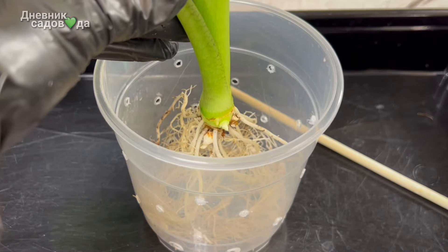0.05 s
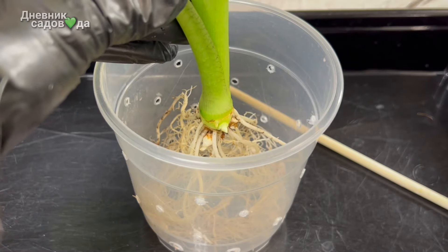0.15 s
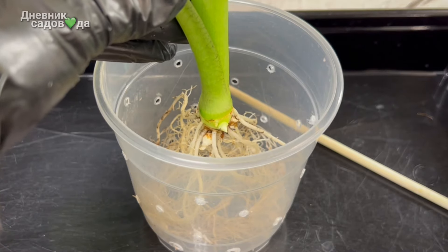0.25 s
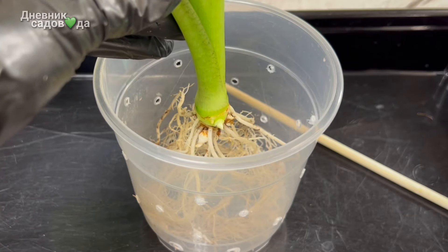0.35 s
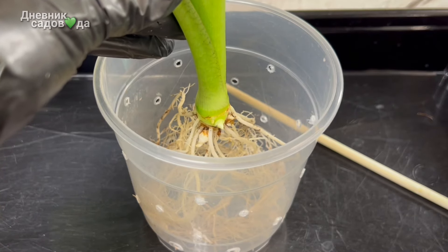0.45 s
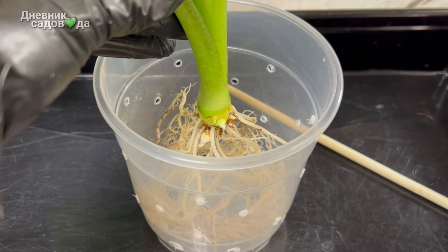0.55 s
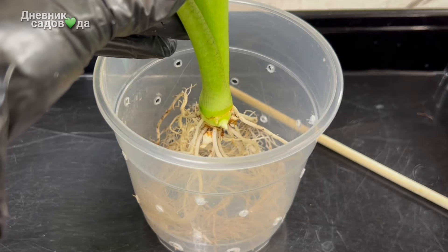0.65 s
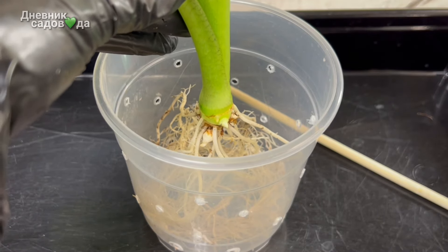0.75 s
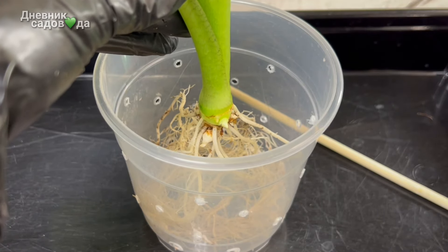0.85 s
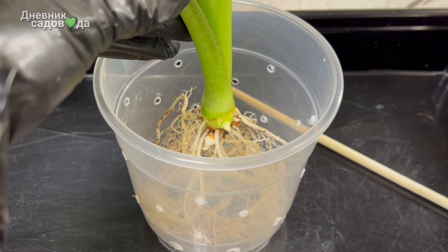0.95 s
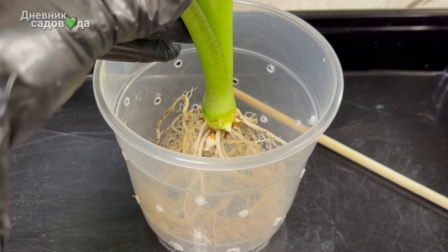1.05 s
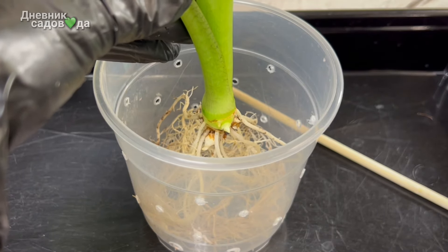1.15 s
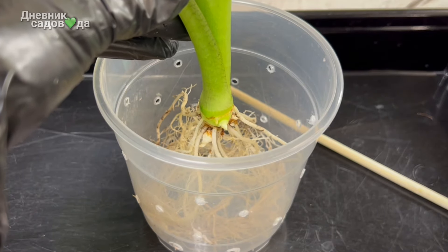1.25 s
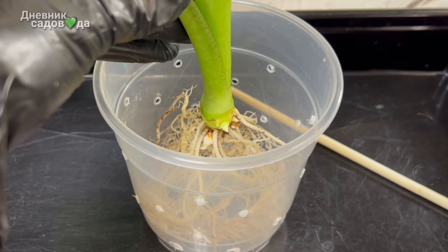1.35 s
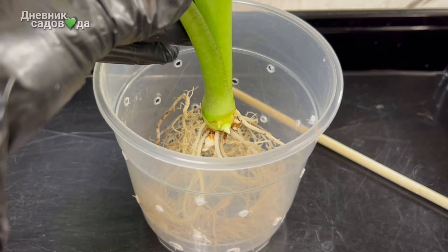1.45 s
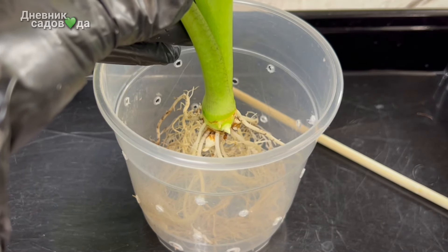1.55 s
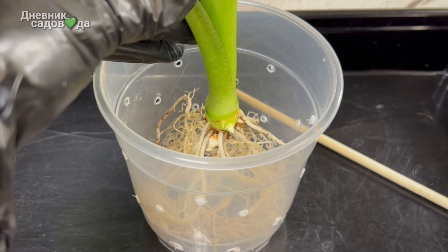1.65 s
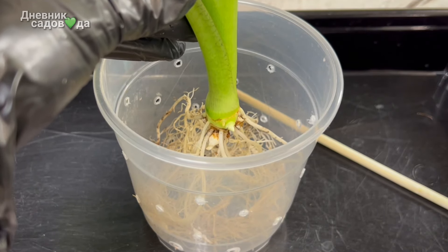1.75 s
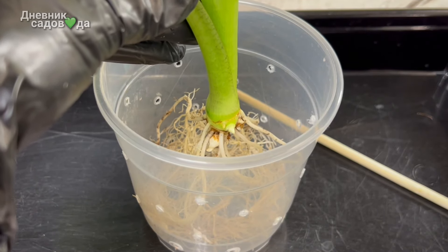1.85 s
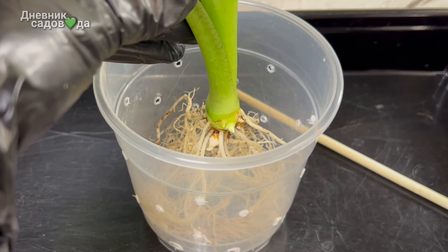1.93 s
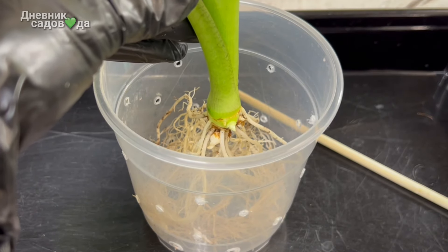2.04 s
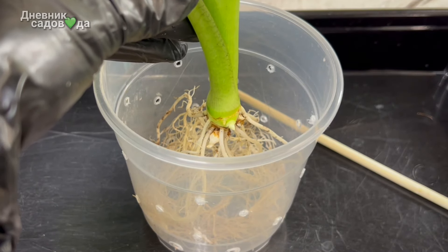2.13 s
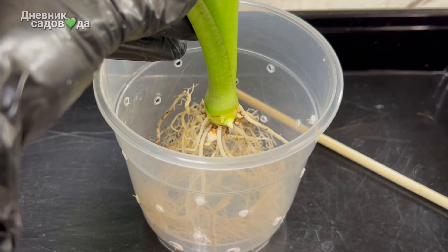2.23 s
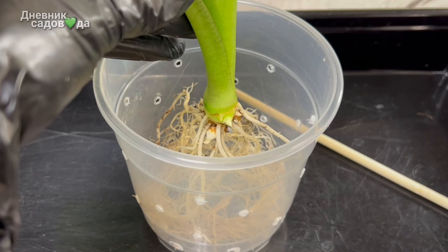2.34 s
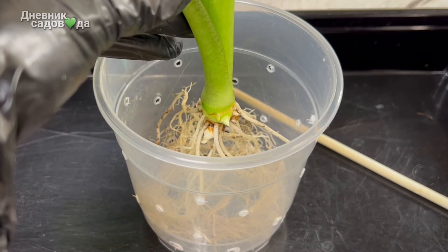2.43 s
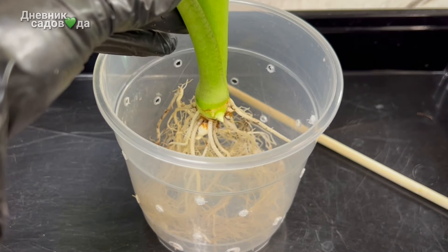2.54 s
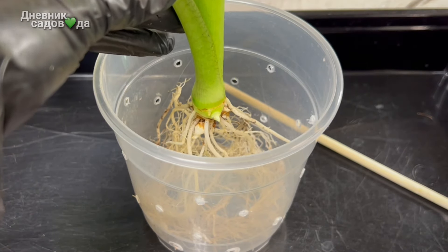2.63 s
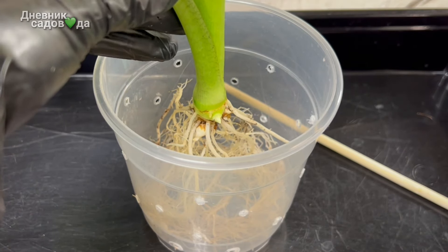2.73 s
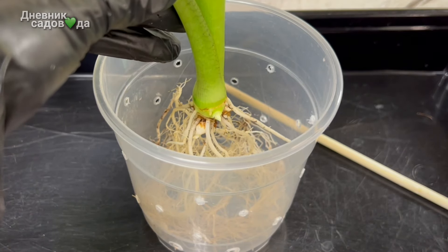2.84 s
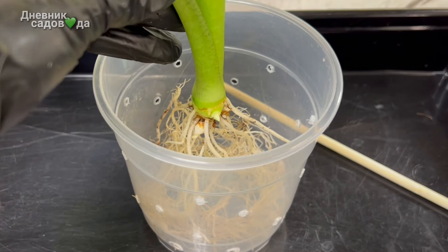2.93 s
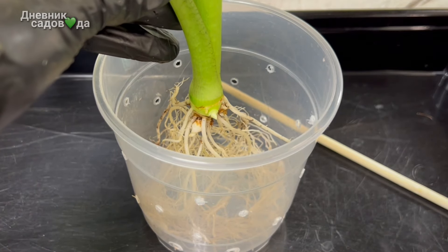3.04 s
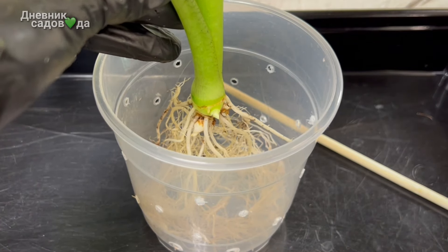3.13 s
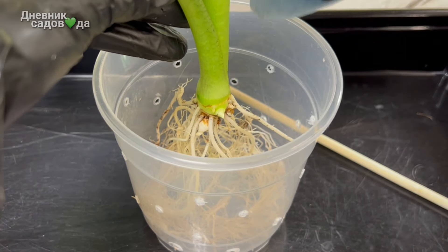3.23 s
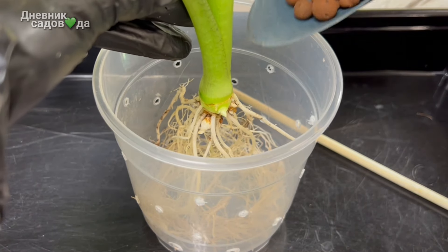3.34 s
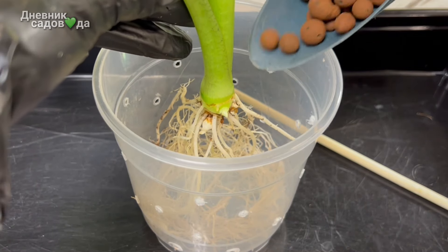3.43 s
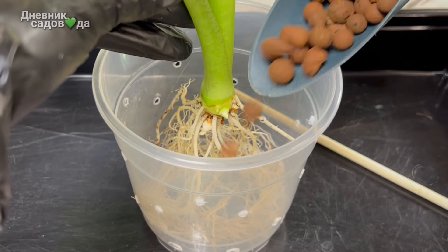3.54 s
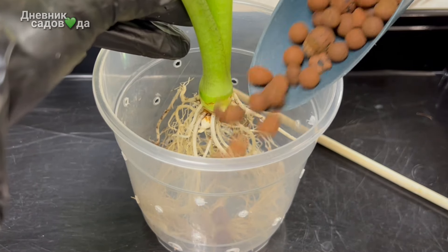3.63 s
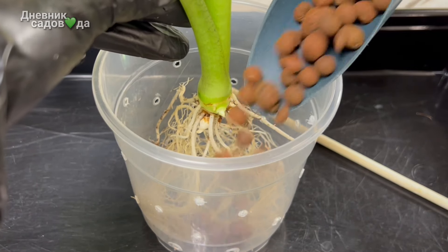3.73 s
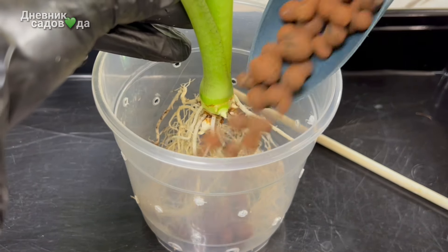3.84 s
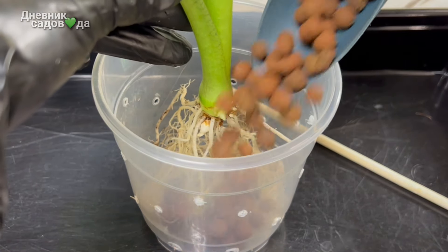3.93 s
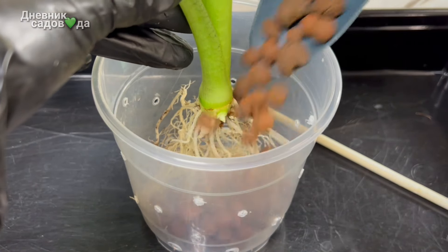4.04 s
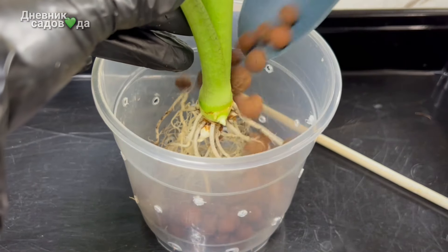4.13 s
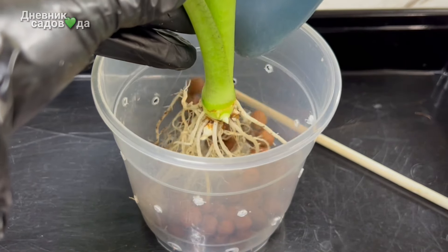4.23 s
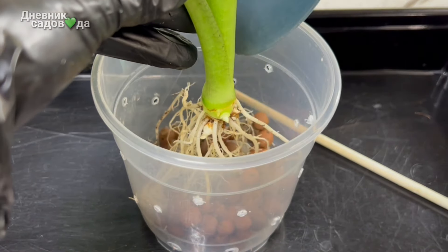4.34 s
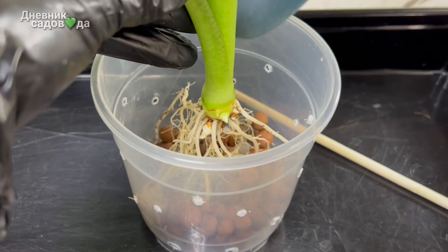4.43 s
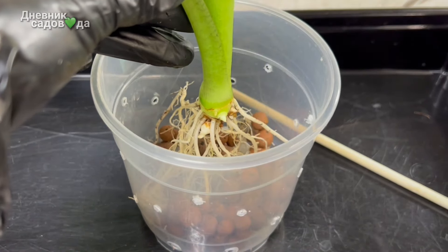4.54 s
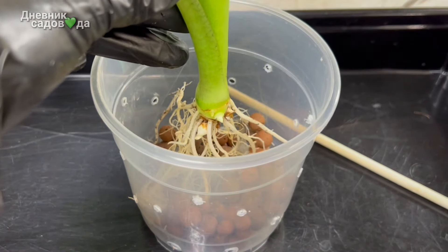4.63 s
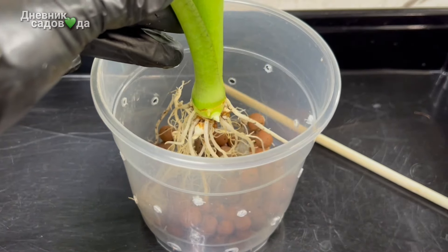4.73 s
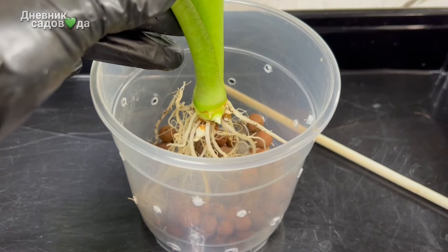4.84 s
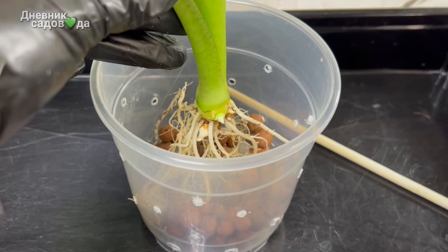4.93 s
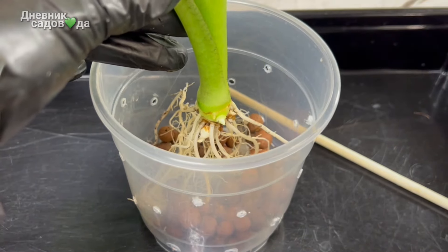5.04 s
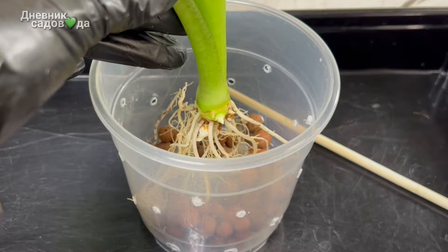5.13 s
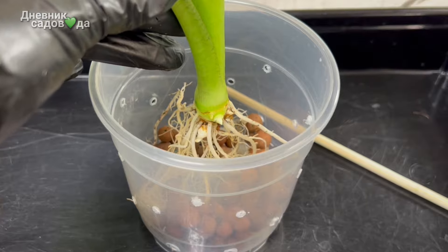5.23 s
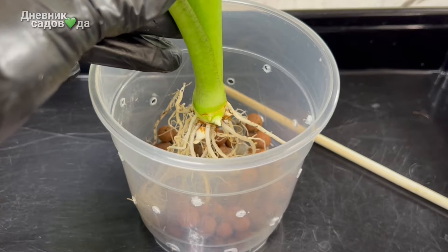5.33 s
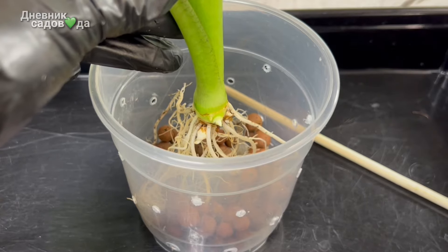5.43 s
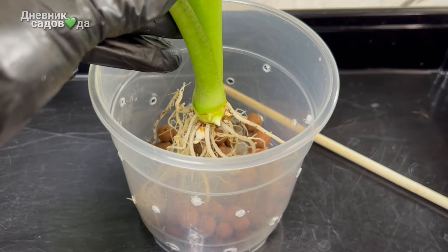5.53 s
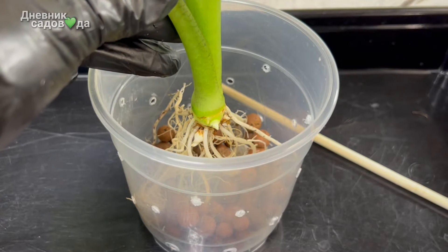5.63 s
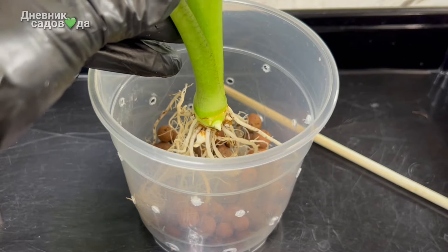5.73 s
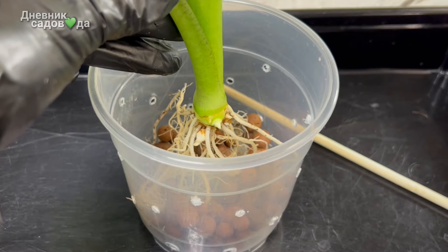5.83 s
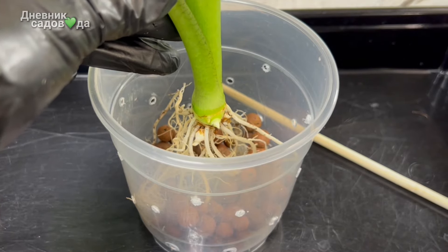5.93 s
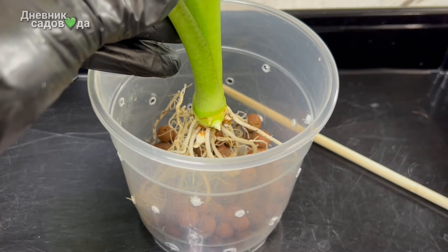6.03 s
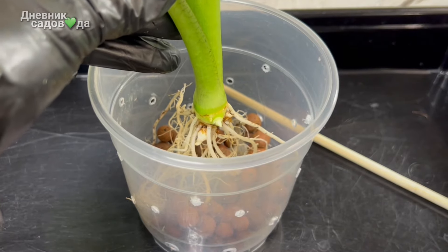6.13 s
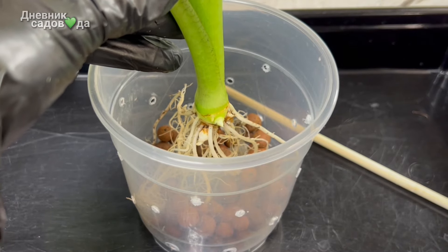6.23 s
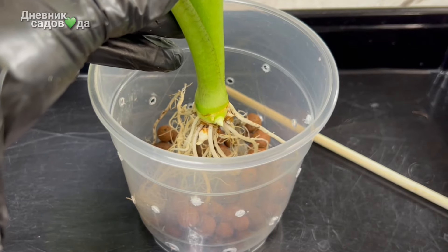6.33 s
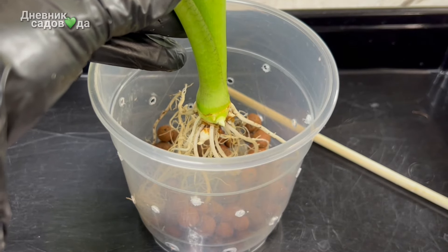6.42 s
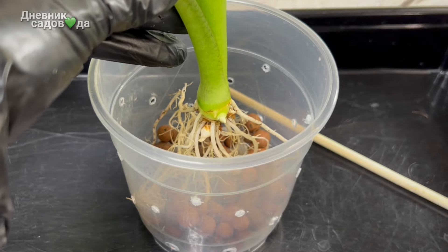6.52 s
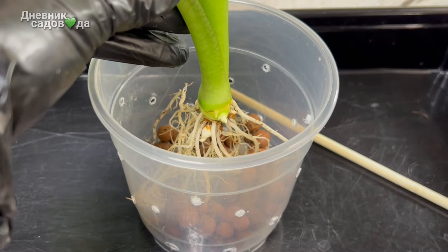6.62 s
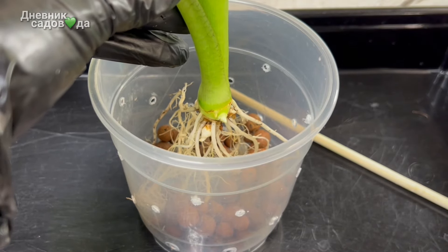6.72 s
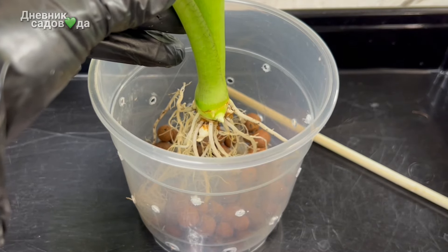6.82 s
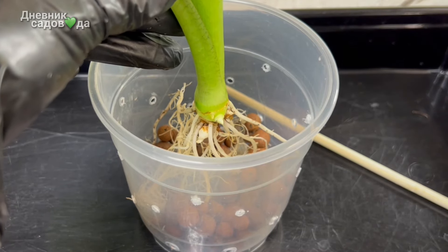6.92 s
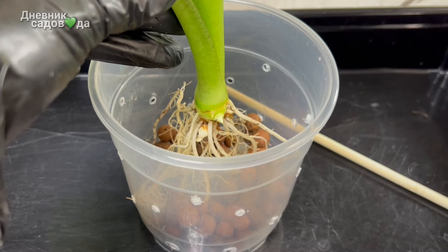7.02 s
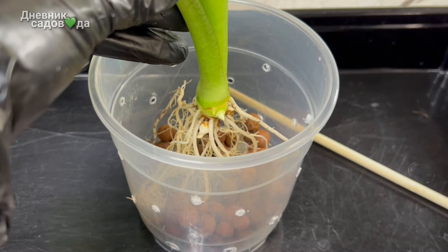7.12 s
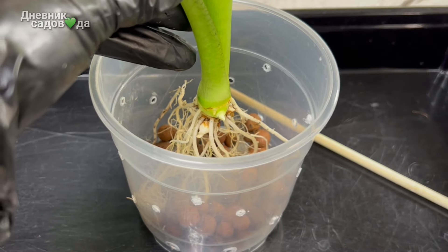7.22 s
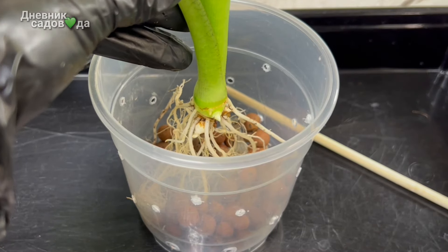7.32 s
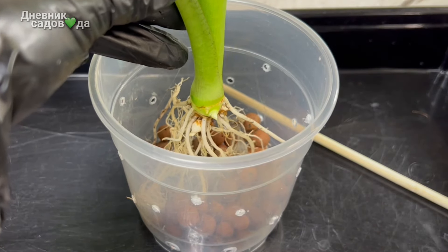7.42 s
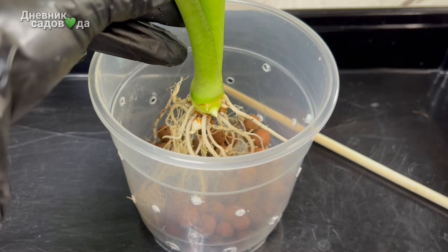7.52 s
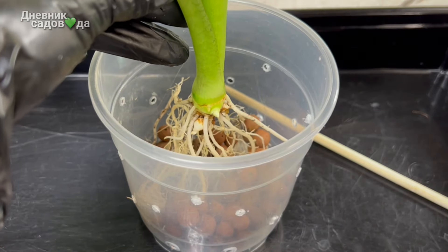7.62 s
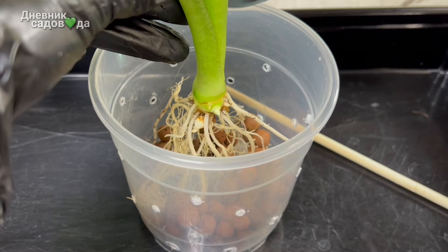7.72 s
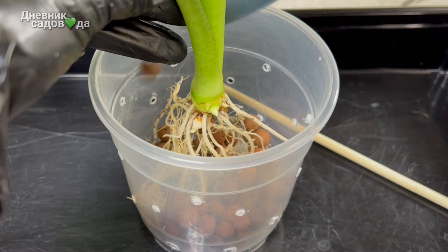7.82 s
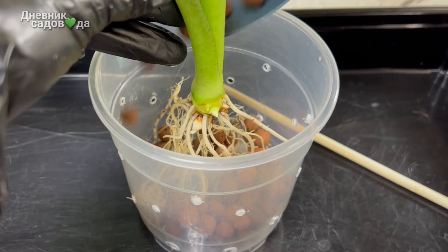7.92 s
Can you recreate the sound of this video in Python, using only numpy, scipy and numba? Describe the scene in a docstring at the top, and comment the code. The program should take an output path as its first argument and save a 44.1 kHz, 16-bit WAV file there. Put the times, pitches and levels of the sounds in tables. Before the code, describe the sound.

A small indoor room with a faint steady hush and low rumble, heard close up. From about 0.1 s a plastic scoop knocks and pushes into a bucket of clay pebbles: dense, crunchy rattle, hollow scoop resonance and a dull bucket boom, strongest around 0.3-0.8 s, easing afterwards. At 1.5-2.0 s loose pebbles clack sharply as the scoop comes out. From 2.3 to 3.4 s it is nearly quiet, with tiny ticks. At 3.5-4.4 s pebbles pour into a thin plastic pot, a bright clatter with hard clicks and short hollow thuds, densest near 4 s. A very faint falling squeak comes at 4.9 s, with soft glove rustling until 5.4 s. Around 5.5 s the scoop digs again, crunching hardest near 6.1 s, with bright clacks at 6.7-6.9 s. After a lull, ticks gather from 7.4 s and a second pour starts clattering just before 8 s.

```python
"""In a small quiet room with a low rumble, a plastic scoop digs clay pebbles out of a bucket.
It carries them over and pours them into a plastic pot; a faint squeak and a rustling glove follow.
Then the scoop digs again and a second pour begins. Thousands of random touches ring the pebbles' pitches;
touches also ring the bucket, scoop and pot, and single pebbles clack as noise and fading tones."""
import sys
import numpy as np
from scipy import signal
from scipy.fft import rfft, irfft, next_fast_len
from scipy.io import wavfile
from scipy.ndimage import uniform_filter1d
from numba import njit

SR = 44100
rng = np.random.default_rng(int(sys.argv[2]) if len(sys.argv) > 2 else 0)


def master_out(mix):
    """Clip the mix to full scale and print it as 16-bit PCM to the path in sys.argv[1]."""
    frames = np.transpose(np.atleast_2d(mix))
    ceiling = np.clip(frames, -1, 1)
    pcm = np.round(ceiling * 32767).astype(np.int16)
    wavfile.write(sys.argv[1], SR, pcm)


N = 351477   # length in samples

# The room's steady hush, as a spectrum shape: pitch_hz, relative_level_db
AIR_SPECTRUM = [(8.8, -13), (15, 1.5), (28, -27.5), (70, -54), (93, -32.5), (282, -38.5), (927, -47),
                (1010, -40), (1100, -50), (1560, -46.5), (3850, -52.5), (5610, -54.5), (15500, -58.5)]
# Digging, one table per scoopful: time_s, rattle_db, treble_over_rattle_db, bucket_boom_db
DIG_CURVES = [
    [(0.13, -32, -4.5, -31.5), (0.17, -49.5, -9, -42), (0.2, -41.5, -3.5, -32), (0.24, -45, 7, -42),
     (0.32, -30, 2, -26.5), (0.37, -32.5, 1.5, -33), (0.42, -27, 4, -30), (0.49, -28, 1, -26.5),
     (0.525, -34, -1, -34), (0.55, -25, -8.5, -34.5), (0.81, -27, -9.5, -39.5), (0.85, -34, -10.5, -45.5),
     (1.18, -34.5, -3, -43), (1.46, -44, 5.5, -49), (1.54, -36.5, 1.5, -47), (1.67, -42.5, 6, -49.5),
     (1.79, -44, 14.5, -52), (1.92, -43.5, 7.5, -49.5), (2.12, -57, 7.5, -73.5), (2.3, -60, -7, -71.5)],
    [(5.476, -29, -3, -33), (5.5, -48, 12.5, -26.5), (5.515, -33.5, -4, -32), (5.6, -31, 2.5, -31.5),
     (5.726, -24, -5.5, -29), (5.802, -28.5, -8.5, -37.5), (5.968, -38, -7.5, -44.5),
     (6.072, -19.5, -9, -33), (6.29, -37.5, -7, -53.5), (6.4, -32, -6.5, -47), (6.52, -38.5, 4.5, -45),
     (6.646, -39.5, 10, -43), (6.69, -43, 2.5, -52), (6.82, -38, 8, -42.5), (6.9, -44, 13, -49),
     (7.28, -65, -1.5, -66)],
]
# Tone color of the rattle while digging: pitch_hz, relative_level_db
DIG_SPECTRUM = [(710, -32), (1200, -1), (2260, 3), (2980, -2), (3500, -0.5), (4880, -6.5), (6170, -8),
                (11600, -20), (14200, -32), (15500, -53.5)]
# Ringing tones of the bucket's body: pitch_hz, relative_level_db, fade_by_60_db_s
BUCKET_TONES = [(62.5, -6.5, 0.24), (146.2, -15, 0.081), (252, -35, 0.057), (283, -6, 0.26),
                (317.2, -6.5, 0.2), (362.2, 1, 0.079), (393, 0, 0.16), (456.6, -4.5, 0.1)]
# Ringing tones of the bucket's rim: pitch_hz, relative_level_db, fade_by_60_db_s
RIM_TONES = [(648, -2, 0.037), (741, -2.5, 0.056), (827, 4, 0.027), (1395, -8.5, 0.023)]
# Ringing tones of the scoop: pitch_hz, relative_level_db, fade_by_60_db_s
SCOOP_TONES = [(1855, 3, 0.018), (2120, -2, 0.11), (2298, -3, 0.25), (2500, 2, 0.021), (3415, 0, 0.13),
               (3600, -0.5, 0.13), (4700, -17, 0.1), (5020, -17, 0.043)]
# The scoop's hollow tone, purest while empty: time_s, pitch_hz, width_hz
HOLLOW_GLIDE = [(.13, 920, 13.3), (.24, 1070, 18), (.5, 1034, 45), (.62, 994, 53), (1.9, 976, 48),
                (2.2, 1040, 39), (5.47, 1063, 6), (5.635, 1069, 6.7), (5.66, 1050, 85), (6.1, 1030, 41),
                (6.3, 940, 98), (6.66, 954, 57), (6.7, 955, 17), (6.9, 1044, 60), (6.93, 1104, 13),
                (7.05, 1100, 40)]
# Single pebbles: start_s, crack_peak_db, pitch_hz, thud_over_peak_db
CLACK_HITS = [(0.1251, -28.5, 2600, 8.5), (0.1972, -26.5, 2830, -3), (0.2415, -27.5, 4400, 0),
              (0.385, -21, 2500, -4), (0.6814, -28.5, 2230, -19.5), (1.047, -26, 2380, -19),
              (1.424, -24.5, 2120, -10.5), (1.5303, -21, 2180, -9), (1.5768, -24, 2250, -5),
              (1.6132, -22, 3600, -26.5), (1.6792, -20.5, 2300, -11), (1.696, -19.5, 2320, -13.5),
              (1.701, -11, 4700, -27), (1.7231, -14.5, 2200, -27), (1.7554, -12.5, 3440, -22.5),
              (1.7663, -8.5, 3700, -22), (1.7732, -11.5, 4280, -27), (1.8822, -18.5, 4700, -20),
              (1.928, -22, 2330, -22), (1.9998, -23, 3700, -23), (2.1643, -33.5, 3800, -6.5),
              (2.2169, -40.5, 2500, -6.5), (2.2433, -38.5, 4000, -20), (2.319, -46.5, 2550, 0),
              (2.3912, -41, 2270, -12), (2.4319, -51, 2830, -3), (2.55, -53, 2580, -3),
              (2.6352, -48, 5700, -21), (2.903, -44, 2400, -19), (2.9163, -41, 2000, -19),
              (3.182, -45, 3240, -26), (3.41, -36.5, 2450, -25), (3.476, -41, 2280, -15),
              (3.4986, -32.5, 3320, -7.5), (3.585, -24, 3800, -18), (3.6494, -22, 4580, -9.5),
              (3.6644, -25, 3380, -21), (3.7235, -17, 4150, -9.5), (3.77, -18, 3370, -7),
              (3.7854, -17, 3700, -10), (3.8058, -8, 3140, -36.5), (3.8123, -14, 4540, -20.5),
              (3.8284, -22.5, 3000, -4.5), (3.8749, -14.5, 3300, -19), (3.8841, -8.5, 3260, -24),
              (3.9382, -15, 4310, -14.5), (4.0162, -14.5, 3130, -12), (4.0875, -15, 3070, -11.5),
              (4.1031, -6, 3130, -19), (4.1214, -12.5, 3100, -17), (4.1793, -13, 3160, -11),
              (4.2073, -18, 3010, -17), (4.2404, -18, 4000, -11), (4.2617, -18, 4440, -8.5),
              (4.3194, -19.5, 3050, -9.5), (4.338, -17, 5400, -5), (4.362, -22, 4100, -3.5),
              (4.3803, -26.5, 4000, -5), (4.557, -44, 3860, -3.5), (5.455, -48.5, 4200, -7),
              (5.475, -23.5, 2510, -14), (5.5127, -18.5, 2810, -5), (5.5843, -15.5, 3240, -16.5),
              (5.6964, -26, 2360, -8.5), (6.0165, -22, 3820, -21), (6.0661, -25, 2470, 6.5),
              (6.6348, -22.5, 2120, -9), (6.6894, -22.5, 3480, -4.5), (6.7206, -19.5, 2430, -29),
              (6.7386, -9.5, 4380, -32.5), (6.7442, -14, 4400, -12.5), (6.7604, -15, 4700, -28),
              (6.8034, -15, 3600, -17), (6.8163, -15.5, 4500, -36.5), (6.826, -20.5, 4680, -25),
              (6.8735, -15, 3580, -25.5), (7.0645, -33.5, 2920, -6.5), (7.1327, -47, 2600, -1),
              (7.3294, -50.5, 2270, 8.5), (7.3492, -43, 3100, -22), (7.3627, -38, 2320, -24),
              (7.3696, -35.5, 2390, -22), (7.3888, -35.5, 2290, -11), (7.4116, -39, 2410, -24),
              (7.457, -41.5, 2410, -21), (7.467, -38, 2400, -25), (7.5033, -37.5, 2110, -6.5),
              (7.5973, -37, 2110, -13), (7.6353, -34, 2520, -27), (7.674, -42, 2160, -13),
              (7.7059, -31.5, 3270, -21), (7.7286, -26, 2380, -32), (7.7576, -23, 2500, -36),
              (7.8016, -28, 2340, -16), (7.853, -29.5, 2420, -28), (7.882, -24.5, 3280, -20),
              (7.892, -19.5, 3560, -12), (7.9092, -16.5, 3970, -5.5), (7.9144, -14.5, 2080, -11),
              (7.9258, -14.5, 4070, -7), (7.9644, -11, 5150, -15)]
# Ringing tones of one pebble: pitch_ratio, relative_level_db, fade_by_60_db_s
PEBBLE_TONES = [(0.995, -8.5, 0.025), (1.304, -6, 0.005), (0.74, -17, 0.0013)]
# A wall under one pebble: pitch_hz, relative_level_db, fade_by_60_db_s
THUD_TONES = [(412, -31, 0.034), (597, -10, 0.014), (810, -5, 0.036), (1070, -3.5, 0.033)]
# Carrying and pouring, one table per scoopful: time_s, rattle_db, treble_over_rattle_db
POUR_CURVES = [
    [(2.3, -78, -3), (2.45, -90, -10), (2.9, -72, -20), (2.97, -95, -19), (3.28, -71, -24),
     (3.48, -54.5, -18), (3.7, -43.5, -6.5), (3.87, -37, -1), (3.97, -37.5, -0.5), (4.09, -37, 4),
     (4.23, -36, -1.5), (4.37, -43.5, 3), (4.54, -63.5, -5.5), (4.74, -81, -19), (4.96, -73, -11),
     (5.47, -76, -4)],
    [(7.28, -68, -22), (7.386, -70, -8), (7.566, -61.5, -20), (7.7, -55.5, -29), (7.77, -49.5, 3.5),
     (7.84, -48, -6), (7.895, -48, -7.5), (7.97, -30.5, -19)],
]
# Tone color of the rattle while pouring: pitch_hz, relative_level_db
POUR_SPECTRUM = [(710, -42), (1200, -29), (1650, 13), (1880, -10), (2160, 11), (2740, -5), (3140, 8),
                 (9570, -11), (12000, -9.5), (15500, -52)]
# Thudding tones of the pot: pitch_hz, relative_level_db, fade_by_60_db_s
POT_THUD_TONES = [(145, -11, 0.04), (358, -8, 0.089), (504, -1.5, 0.015), (670, 2.5, 0.058),
                  (920, 5, 0.032), (1070, -0.5, 0.032), (1410, -4, 0.018)]
# Ringing tones of the pot: pitch_hz, relative_level_db, fade_by_60_db_s
POT_RING_TONES = [(1860, 6.5, 0.044), (1943, 5, 0.037), (2080, -16, 0.048), (3050, -16, 0.045)]
# Bunches of pebbles hit the pot's wall: peak_time_s, ring_db
POT_BUNCHES = [(2.93, -65), (3.72, -32.5), (3.89, -25.5), (3.99, -26), (4.09, -23), (4.24, -24),
               (4.16, -27), (4.32, -23), (4.39, -41.5), (7.386, -50), (7.904, -29)]
# A faint falling squeak: time_s, level_db, pitch_hz
SQUEAK_GLIDE = [(4.86, -75, 2550), (4.9, -55, 2380), (4.97, -74, 2060), (5.03, -69, 1450),
                (5.06, -75, 1350)]
# Creases of a glove: peak_time_s, level_db
GLOVE_CREASES = [(4.902, -58), (5.002, -60), (5.09, -65), (5.16, -57), (5.26, -62), (5.36, -66)]

AIR_DB = -46.5
RUMBLE_DB, RUMBLE_UNDER_BOOM_DB, RUMBLE_SWELL_S = -60, -30, 0.162
TREBLE_MEAN_DB = -4   # the treble setting that leaves a rattle's spectrum as it is
RIM_RATTLE_SHARE, RIM_DB = 0.75, -4.5   # the rim's level lies between rattle and boom
BURIED_DAMPING = 0.4   # dB the scoop's ring loses per dB of boom over rattle, deep in the heap
# The hollow tone follows rattle, boom and treble; it gains PURE_DB per halving of its width
HOLLOW_DB, HOLLOW_TREBLE_SHARE, HOLLOW_BOOM_SHARE, PURE_DB = -6.5, 0.36, 0.2, 3.5
CRACK_T60_S, SKITTER_T60_S = 0.0054, 0.15   # time to fade by 60 dB
SKITTER_DB, SKITTER_SPREAD_DB = -10, 3
STRAY_COUNT = 110
# Lesser clacks follow the treble of the rattle and crowd where it is loud
STRAY_FOLLOW, STRAY_DB, STRAY_THUD_DB, STRAY_CROWDING = 0.76, -1, -13, 0.3
THUDS_FOLLOW, THUDS_DB, POT_RING_DB = 0.94, -5.5, -14   # the pot against the rattle
BUNCH_RISE_DB_S, BUNCH_FALL_DB_S = 900, 166
SQUEAK_WIDTH_HZ = 120
RUSTLE_RISE_DB_S, RUSTLE_FALL_DB_S = 253, 248
ROOM_T60_S, ROOM_DB, WALL_CUT_HZ = 0.2, -15, 2600
CUTOFF_HZ = 15750


def from_db(db):
    """Turn decibels into gain."""
    return 10 ** (np.asarray(db) / 20)


def rms_one(x):
    """Scale a sound to an average strength (rms) of 1."""
    return x / np.sqrt(np.mean(x ** 2) + 1e-20)


def in_time(tables):
    """Draw table columns as curves over time, with a switch that is 1 while a table lasts."""
    t = np.arange(N) / SR
    s, *columns = np.transpose(np.concatenate(tables))
    active = sum((t >= rows[0][0]) & (t <= rows[-1][0]) for rows in tables) > 0
    return active, [np.interp(t, s, c) for c in columns]


def at_hz(points, hz):
    """Read a spectrum between its points, spacing pitches as the ear does."""
    point_hz, point_db = np.array(points).T
    return np.interp(np.log(hz), np.log(point_hz), point_db)


def band_noise(x, low_hz, high_hz, order):
    """Keep only the sound around a range of pitches."""
    return signal.sosfilt(signal.butter(order, [low_hz, high_hz], "band", fs=SR, output="sos"), x)


def no_bass(x):
    """Take out the bass, which small things do not radiate."""
    return signal.sosfilt(signal.butter(2, 200., "high", fs=SR, output="sos"), x)


def ring(touches, hz, t60):
    """Let touches ring one fading tone, scaled so that noise keeps its level."""
    r = from_db(-60 / (t60 * SR))   # what is left after one sample
    w = 2 * np.pi * hz / SR
    push = np.sin(w) * np.sqrt(2 - 2 * r * r)
    return signal.lfilter([0, push], [1, -2 * r * np.cos(w), r * r], touches + 1e-18)


@njit
def gliding(x, hz, r):
    """Ring a tone whose pitch and width can move, while noise keeps its level."""
    out = np.zeros(len(x))
    for i in range(2, len(x)):
        back = 2 * r[i] * np.cos(2 * np.pi * hz[i] / SR) * out[i - 1] - r[i] ** 2 * out[i - 2]
        out[i] = np.sqrt(1 - r[i]) * x[i] + back
    return out


def contacts(per_s, uneven_db):
    """Make random touches, mostly light and now and then hard, with rms 1."""
    draw, out = rng.random(N) * SR / per_s, np.zeros(N)
    at = np.flatnonzero(draw < 1)
    hardness = np.minimum(-np.log(draw[at]), 4.)
    out[at] = from_db(uneven_db * hardness) * (-1.) ** at
    return rms_one(out)


def clumps(rate, depth_db):
    """Make a gain that wanders, as when things slip in bunches."""
    steps = rng.standard_normal(1000)
    wander = np.interp(np.arange(N) / SR * rate, np.arange(len(steps)), steps)
    return from_db(depth_db * wander)


def bursts(rows, rise_db_s, fall_db_s):
    """Draw the dB level of short swells, each rising to its moment and dying away."""
    t = np.arange(N) / SR
    swells = [db - np.maximum(rise_db_s * (s - t), fall_db_s * (t - s)) for s, db in rows]
    return np.max(swells, axis=0)


def rattle(level_db, treble_db, spectrum, per_s, uneven_db, cycles):
    """Each touch rings three far-apart pebble pitches for a few cycles; the treble has its own control."""
    touches = contacts(per_s, uneven_db) * from_db(level_db)
    pitches = np.geomspace(1250, 15000, num=24)
    groups = len(pitches) // 3
    dealt = rng.integers(0, groups, N)
    low, high = 0, 0
    for k, hz in enumerate(pitches):
        rung = ring(touches * (dealt == k % groups), hz, cycles / hz)
        rung = rung * np.sqrt(hz / 8750.0) * from_db(at_hz(spectrum, hz))
        treble_share = np.clip(np.log2(hz / 2080.0) / 2.0, 0, 1)
        low = low + (1 - treble_share) * rung
        high = high + treble_share * rung
    return low + from_db(treble_db - TREBLE_MEAN_DB) * high


def walls(level_db, modes, per_s, uneven_db):
    """Pebbles drum on a wall, and each of its tones is struck by touches of its own."""
    level = from_db(level_db - 8.5)
    return sum(from_db(db) * ring(level * contacts(per_s, uneven_db), hz, t60) for hz, db, t60 in modes)


def still_air():
    """The steady hush of the room is noise shaped by a spectrum."""
    hz = np.maximum(np.arange(N // 2 + 1) * SR / N, 1)
    shaped = rfft(rng.standard_normal(N)) * from_db(at_hz(AIR_SPECTRUM, hz))
    return from_db(AIR_DB) * rms_one(irfft(shaped, N))


def rumble():
    """Low shaking through the table is deep noise that swells with the bucket's boom."""
    active, (_, _, boom_db) = in_time(DIG_CURVES)
    swell = active * from_db(boom_db + RUMBLE_UNDER_BOOM_DB)
    swell = uniform_filter1d(swell, size=int(RUMBLE_SWELL_S * SR))
    low = band_noise(rng.standard_normal(N), 25., 65., order=2)
    return (from_db(RUMBLE_DB) + swell) * clumps(5., depth_db=3.0) * rms_one(low)


def strays():
    """List lesser clacks at chance moments and pitches, more and louder where the rattle is bright."""
    tables = sorted([row[:3] for row in table] for table in DIG_CURVES + POUR_CURVES)
    active, (rattle_db, treble_db) = in_time(tables)
    bright_db = rattle_db + treble_db
    odds = np.cumsum(active * from_db(STRAY_CROWDING * bright_db))
    when, pitch, size = rng.random((STRAY_COUNT, 3)).T
    at = np.searchsorted(odds, when * odds[-1])
    db = STRAY_DB + STRAY_FOLLOW * bright_db[at] - 6 * size
    return [(a / SR, d, 2100 * 2.4 ** p, STRAY_THUD_DB) for a, d, p in zip(at, db, pitch)]


def clacks():
    """A pebble cracks around its pitch, rings, thuds on the wall and sets its neighbors skittering."""
    out, t = np.zeros(N + 4096), np.arange(4096) / SR
    rows = CLACK_HITS + strays()
    chance = rng.normal(0, 1, (len(rows), 2, len(PEBBLE_TONES) + len(THUD_TONES)))
    noise = rng.standard_normal((len(rows), 3, len(t)))
    knocks = np.repeat(from_db(3.75 * noise[:, 2, ::64]), 64, axis=1)   # the skitter comes in uneven knocks
    onset = 1 - np.exp(-t / 0.00022)   # the contact takes a moment
    dull = signal.butter(1, 9000., fs=SR, output="sos")   # porous clay gives little top
    crack_fade_db, skitter_fade_db = -60 * t / CRACK_T60_S, -60 * t / SKITTER_T60_S
    is_pebble = np.arange(chance.shape[2]) < len(PEBBLE_TONES)
    for (s, db, hz, thud_db), (detune, strength), (a, b, c), knock in zip(rows, chance, noise, knocks):
        modes = [(hz * ratio, d, t60) for ratio, d, t60 in PEBBLE_TONES]
        modes += [(f, thud_db + d, t60) for f, d, t60 in THUD_TONES]
        f, d, t60 = np.transpose(modes)[:, :, None]
        fading = from_db(d + 1.2 * strength[:, None] - 60 * t / t60)
        waves = fading * np.sin(2 * np.pi * f * (1 + 0.021 * detune[:, None]) * t)
        ringing, thud = waves[is_pebble].sum(axis=0), waves[~is_pebble].sum(axis=0)
        around = signal.butter(1, [hz * 0.68, hz * 1.545], "band", fs=SR, output="sos")
        around = np.vstack([around, dull])
        crack = onset * (ringing + 1.6 * signal.sosfilt(around, a * from_db(crack_fade_db)))
        skitter_db = SKITTER_DB + SKITTER_SPREAD_DB * c[1] + skitter_fade_db
        skitter = signal.sosfilt(around, b * knock * from_db(skitter_db))
        at = round(s * SR)
        out[at:at + len(t)] += from_db(db) * (crack / np.abs(crack).max() + onset * (thud + skitter))
    return out[:N]


def digging():
    """The heap rattles, the bucket booms, and bright loose touches ring the scoop."""
    active, (rattle_db, treble_db, boom_db) = in_time(DIG_CURVES)
    rim_db = RIM_DB + RIM_RATTLE_SHARE * rattle_db + (1 - RIM_RATTLE_SHARE) * boom_db
    scoop_db = rattle_db + 0.88 * treble_db - BURIED_DAMPING * (boom_db - rattle_db) - 11
    heap = rattle(rattle_db, treble_db, DIG_SPECTRUM, per_s=5000., uneven_db=0.5, cycles=19.0)
    heap = heap * clumps(60., depth_db=2.0)   # pebbles slip in bunches
    boom = walls(boom_db, BUCKET_TONES, per_s=440.0, uneven_db=1.5)
    rim = walls(rim_db, RIM_TONES, per_s=400., uneven_db=2.5)
    scoop = walls(scoop_db, SCOOP_TONES, per_s=300., uneven_db=3.0)
    return active * (boom + no_bass(heap + rim + scoop))


def hollow():
    """Many light touches keep one gliding tone in the scoop sounding, louder where it is purer."""
    active, (rattle_db, treble_db, boom_db) = in_time(DIG_CURVES)
    _, (hz, width_hz) = in_time([HOLLOW_GLIDE])
    width_hz = np.maximum(width_hz, 2)
    level_db = HOLLOW_DB + rattle_db + HOLLOW_BOOM_SHARE * (boom_db - rattle_db)
    level_db = level_db + HOLLOW_TREBLE_SHARE * treble_db - PURE_DB * np.log2(width_hz / 40)
    tone = gliding(contacts(3000., 3.0), hz, np.exp(-np.pi * width_hz / SR))
    return rms_one(tone) * active * from_db(level_db)


def pouring():
    """Pebbles roll off the scoop and fall into the pot, with fewer and harder touches than in digging."""
    active, (rattle_db, treble_db) = in_time(POUR_CURVES)
    bunch_db = bursts(POT_BUNCHES, BUNCH_RISE_DB_S, BUNCH_FALL_DB_S)
    ring_db = np.maximum(rattle_db + POT_RING_DB, bunch_db)
    stream = rattle(rattle_db + 2.0, treble_db, POUR_SPECTRUM, per_s=4100.0, uneven_db=3.5, cycles=23.0)
    thuds = walls(THUDS_DB + THUDS_FOLLOW * rattle_db, POT_THUD_TONES, per_s=430.0, uneven_db=3.5)
    pot = walls(ring_db - 5.5, POT_RING_TONES, per_s=900.0, uneven_db=1.0)
    return active * (stream + thuds + pot)


def squeak():
    """A faint, rough squeak slides down in pitch as random touches ring a gliding tone."""
    active, (level_db, hz) = in_time([SQUEAK_GLIDE])
    r = np.full(N, np.exp(-np.pi * SQUEAK_WIDTH_HZ / SR))
    return active * from_db(level_db) * rms_one(gliding(contacts(3000., 2.), hz, r))


def glove():
    """Thin rubber creases in fine, bright grains."""
    grains = band_noise(contacts(6600.0, 3.6), 2200., 9000., order=1)
    return from_db(bursts(GLOVE_CREASES, RUSTLE_RISE_DB_S, RUSTLE_FALL_DB_S)) * rms_one(grains)


def room(x):
    """Echoes go round ten delay loops, softer and duller on every round."""
    size = next_fast_len(N + SR)
    w = 2 * np.pi * np.arange(size // 2 + 1) / size
    dull = 1 / (1 + 1j * w * SR / (2 * np.pi * WALL_CUT_HZ))
    echoes = 0
    for k, lag in enumerate(rng.uniform(.008, .035, size=10) * SR):   # lag in samples
        loop = from_db(-60 * lag / SR / ROOM_T60_S) * dull * np.exp(-1j * w * round(lag))
        echoes = echoes + (-1) ** k * loop / (1 - loop)   # all rounds added up
    return irfft(rfft(x, size) * echoes, size)[:N]


def scene():
    """Add the sounds of the work, their echo in the room, and the quiet behind them."""
    work = no_bass(clacks() + hollow() + pouring()) + digging() + squeak() + glove()
    return (still_air() + rumble() + work + from_db(ROOM_DB) * room(work))[None]


def record(dry):
    """Cut the top of the sound with a steep filter."""
    return signal.sosfilt(signal.cheby2(14, 70, CUTOFF_HZ, fs=SR, output="sos"), dry)


dry = scene()
out = record(dry)
master_out(out)
```